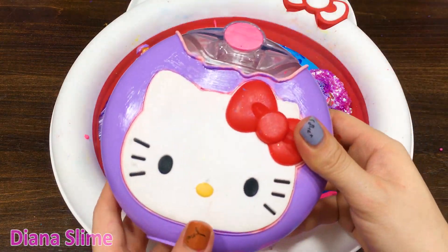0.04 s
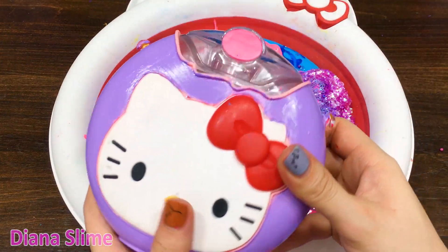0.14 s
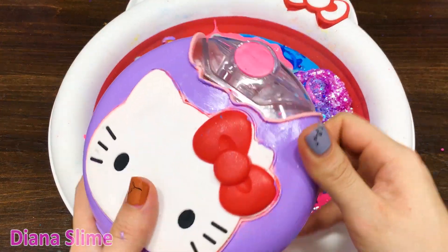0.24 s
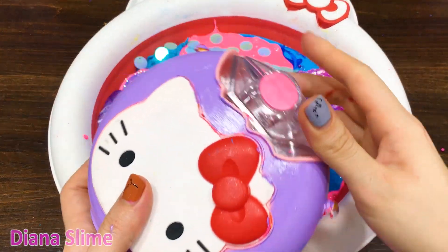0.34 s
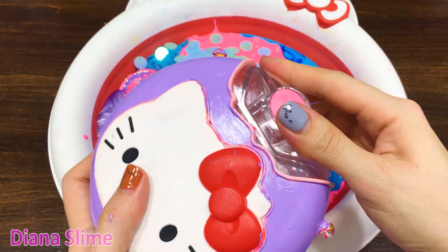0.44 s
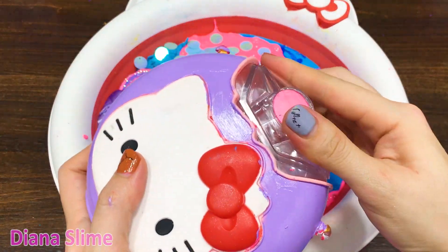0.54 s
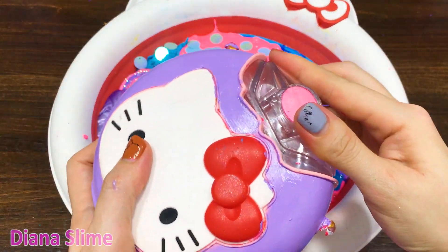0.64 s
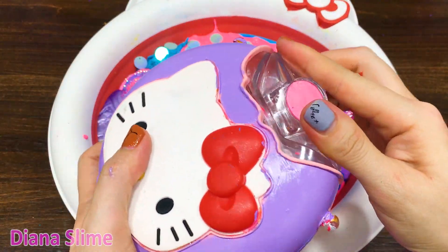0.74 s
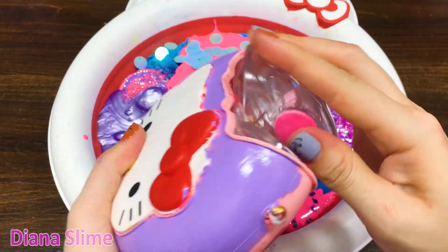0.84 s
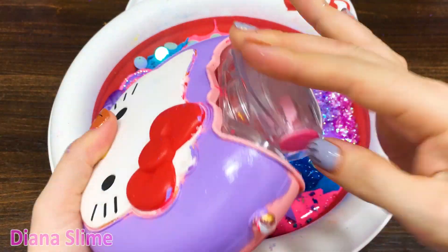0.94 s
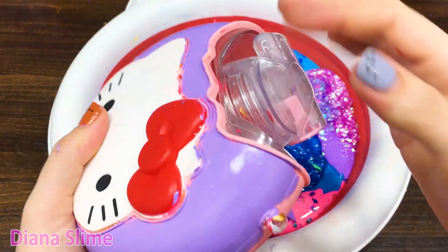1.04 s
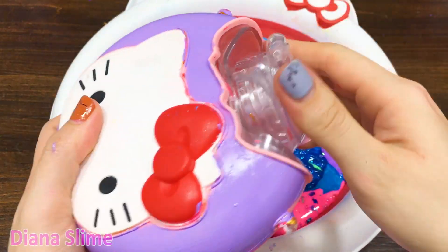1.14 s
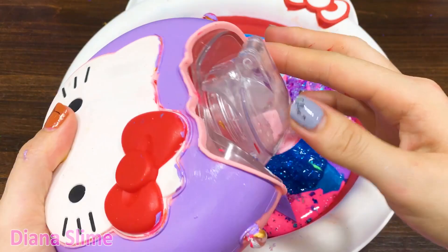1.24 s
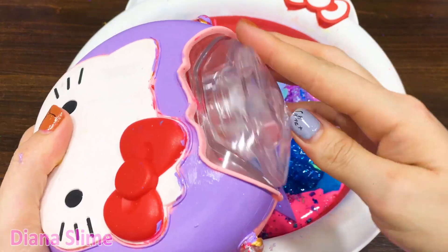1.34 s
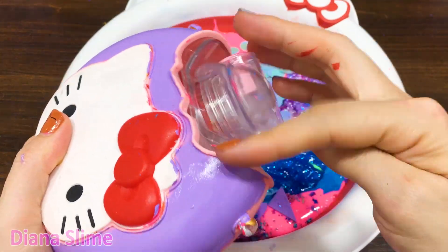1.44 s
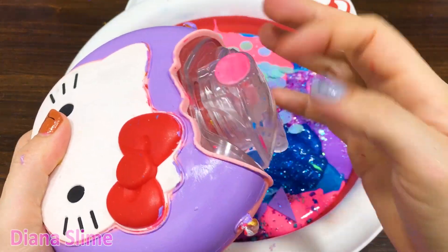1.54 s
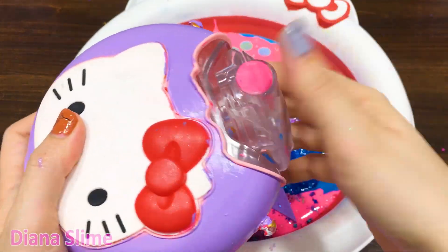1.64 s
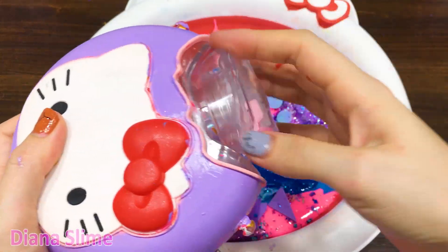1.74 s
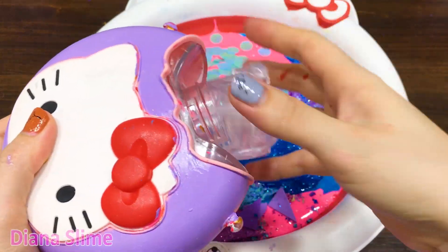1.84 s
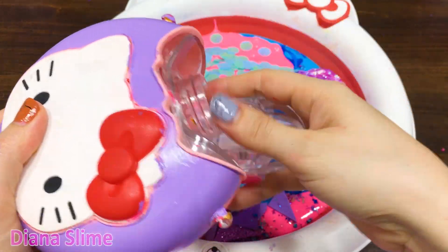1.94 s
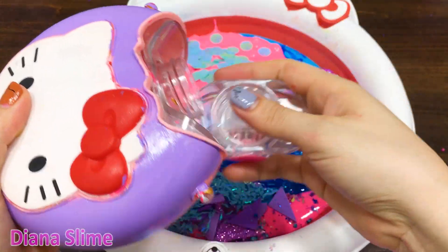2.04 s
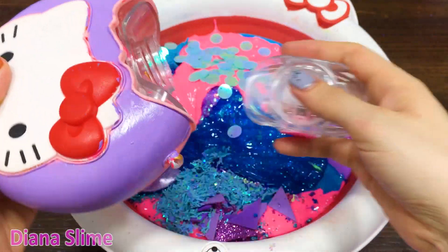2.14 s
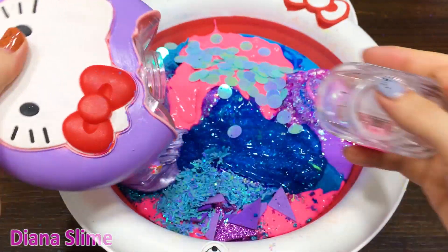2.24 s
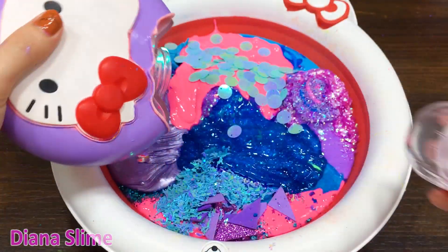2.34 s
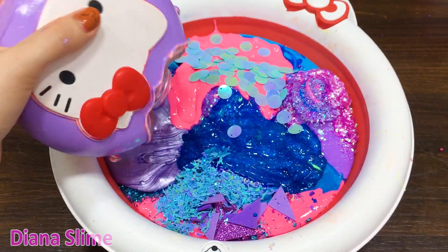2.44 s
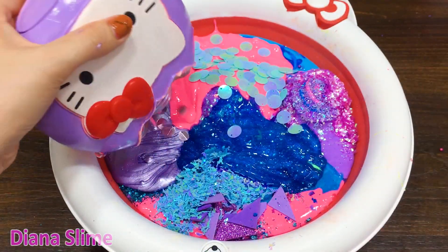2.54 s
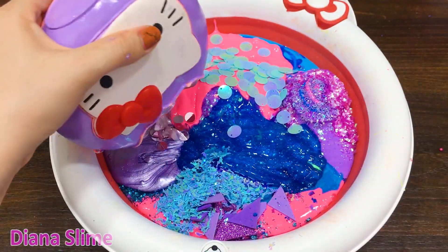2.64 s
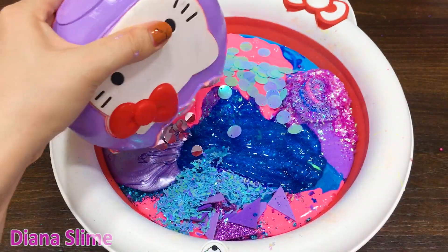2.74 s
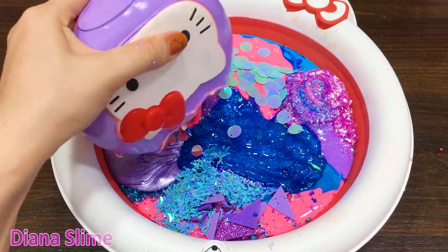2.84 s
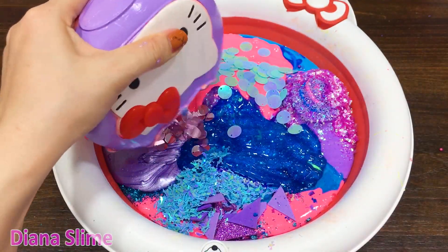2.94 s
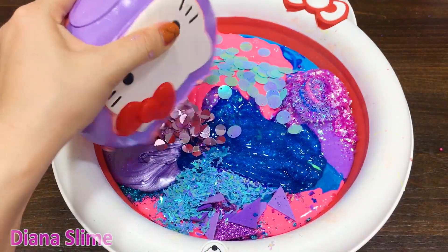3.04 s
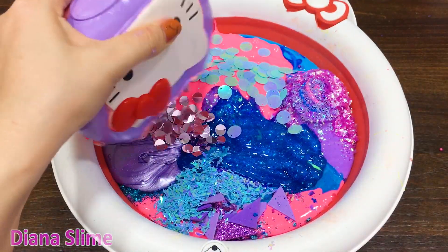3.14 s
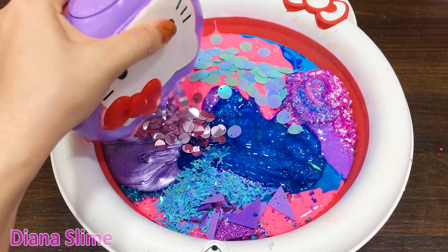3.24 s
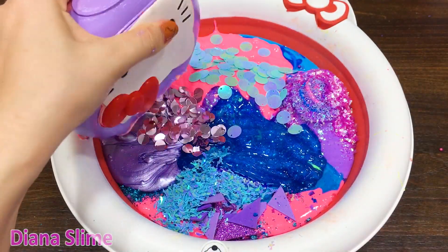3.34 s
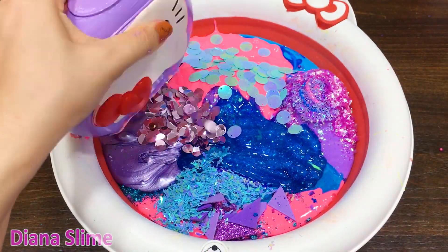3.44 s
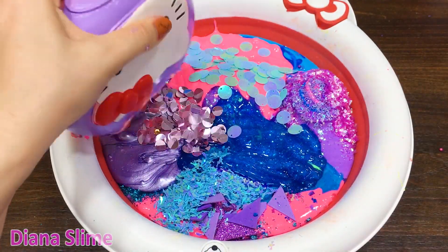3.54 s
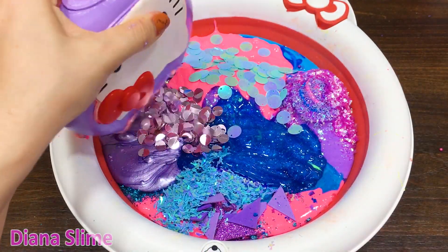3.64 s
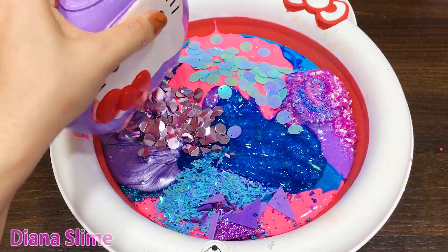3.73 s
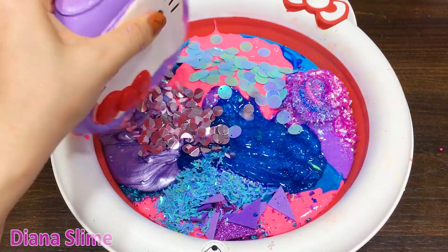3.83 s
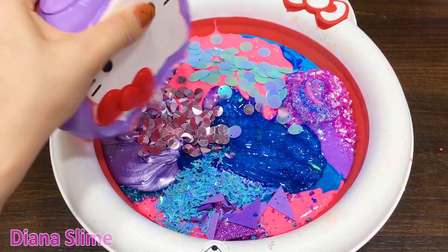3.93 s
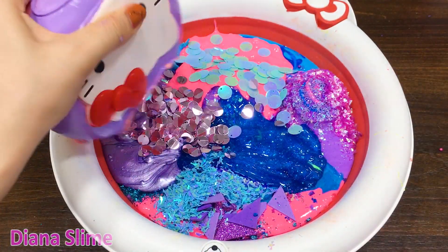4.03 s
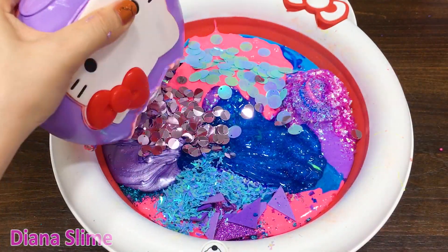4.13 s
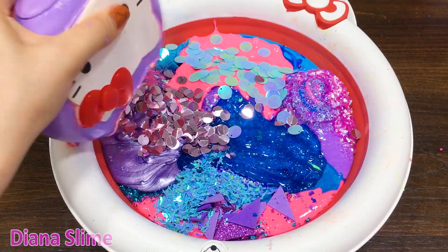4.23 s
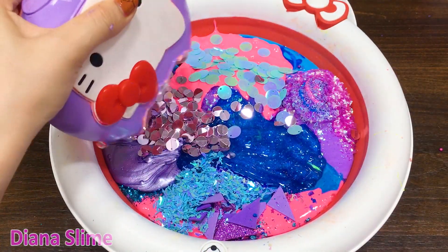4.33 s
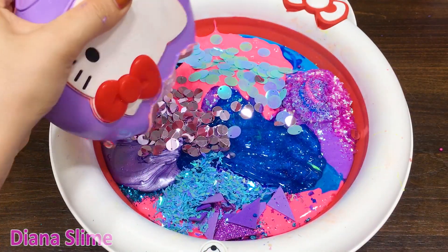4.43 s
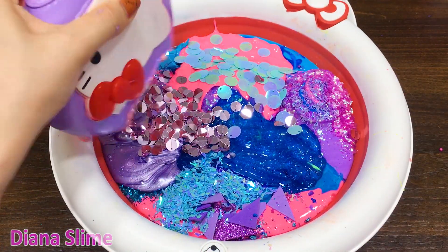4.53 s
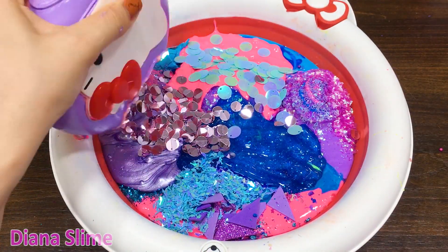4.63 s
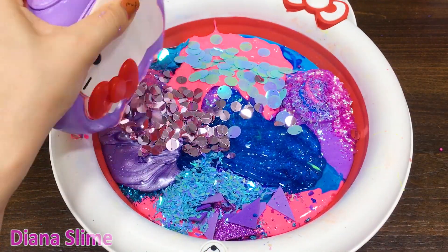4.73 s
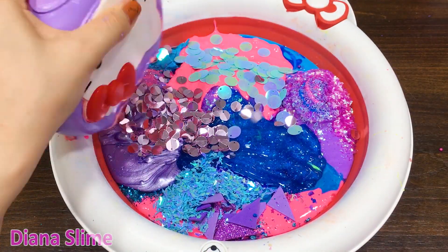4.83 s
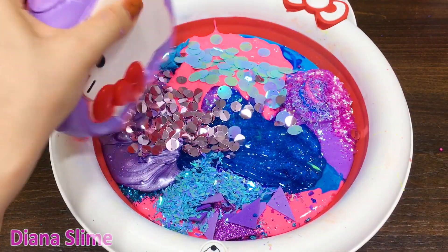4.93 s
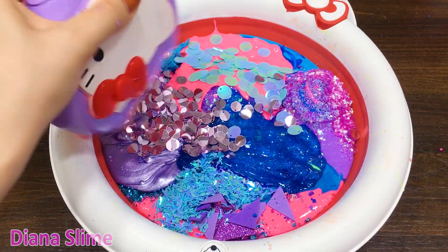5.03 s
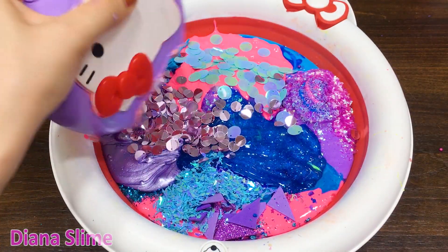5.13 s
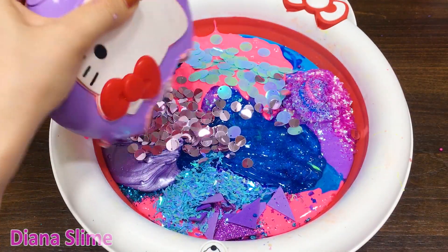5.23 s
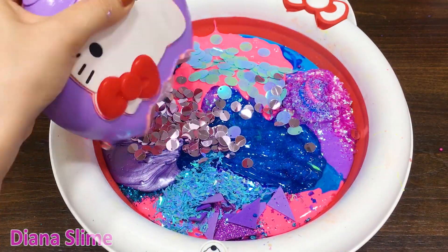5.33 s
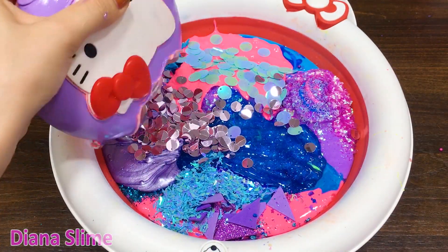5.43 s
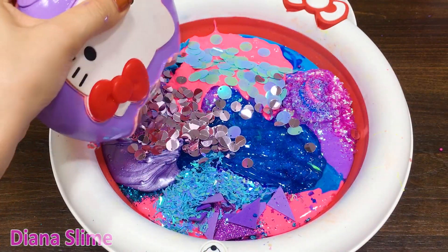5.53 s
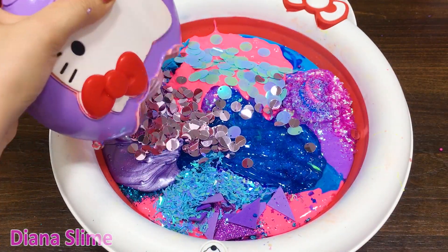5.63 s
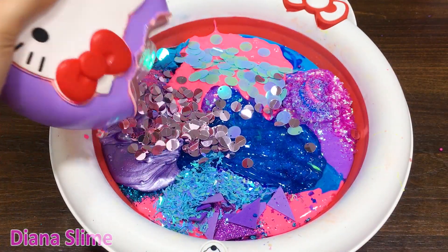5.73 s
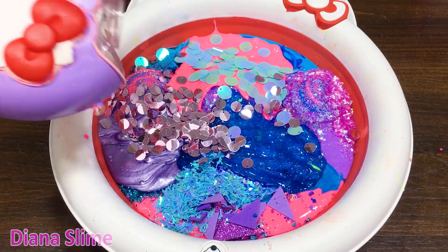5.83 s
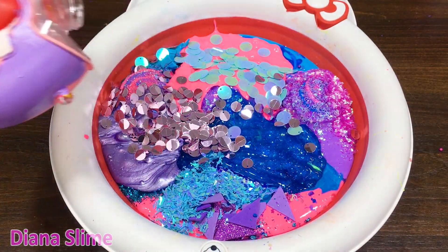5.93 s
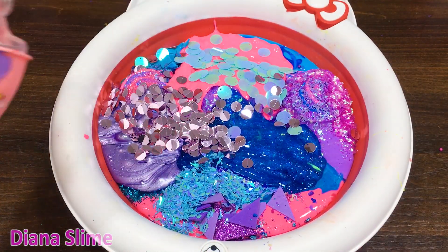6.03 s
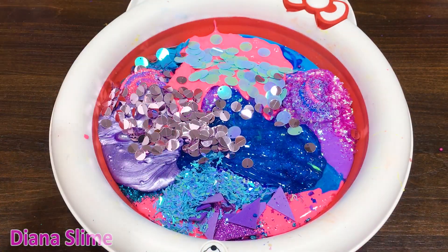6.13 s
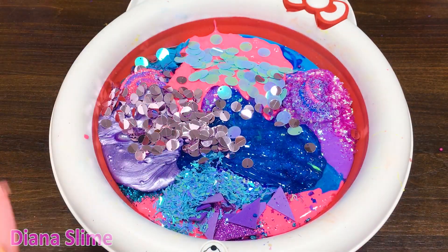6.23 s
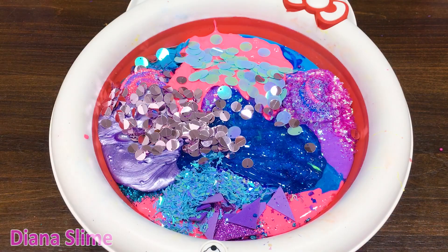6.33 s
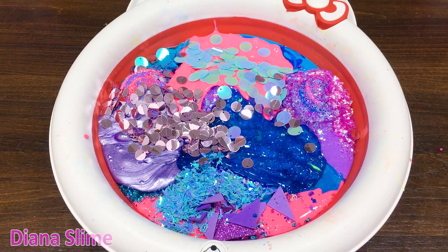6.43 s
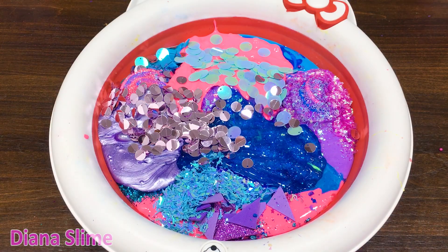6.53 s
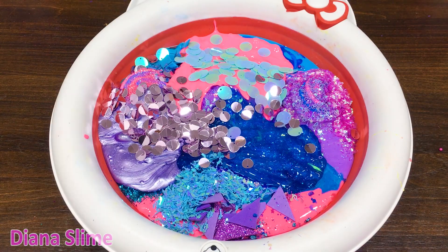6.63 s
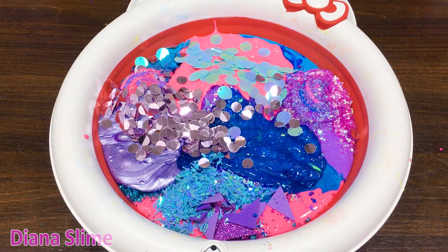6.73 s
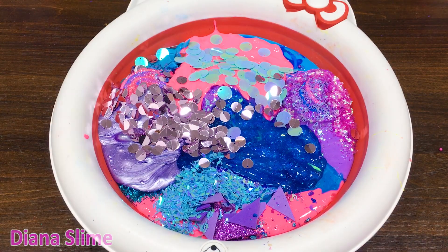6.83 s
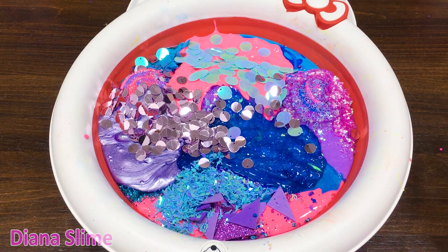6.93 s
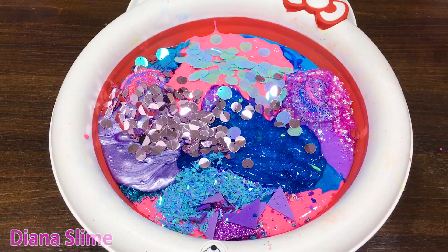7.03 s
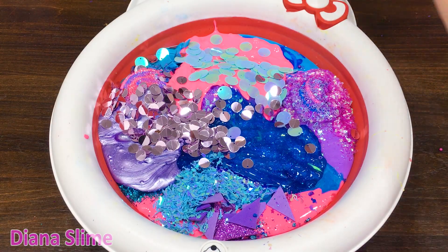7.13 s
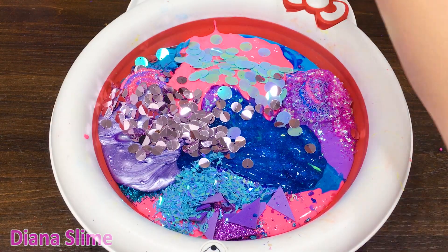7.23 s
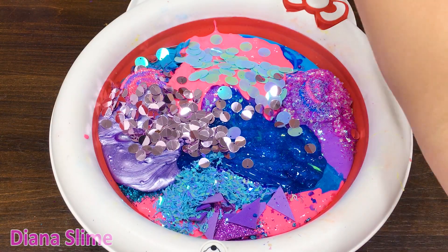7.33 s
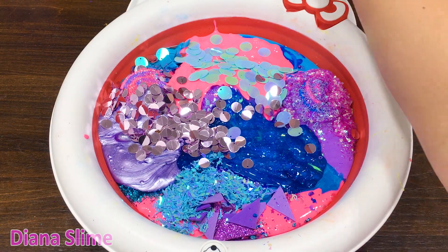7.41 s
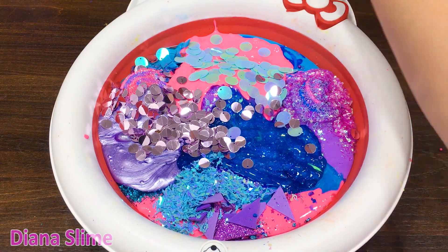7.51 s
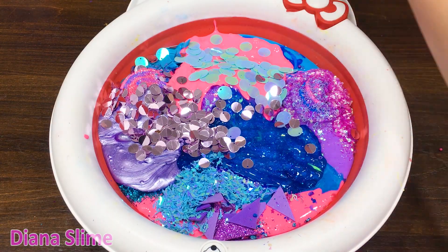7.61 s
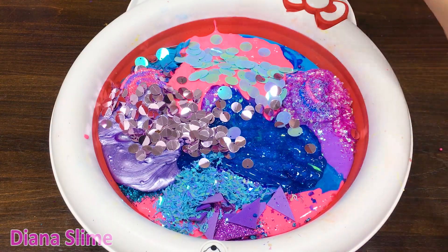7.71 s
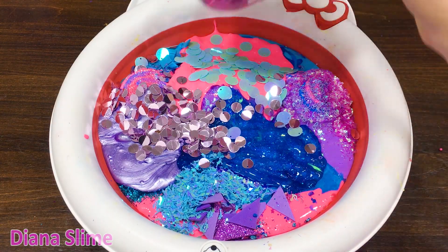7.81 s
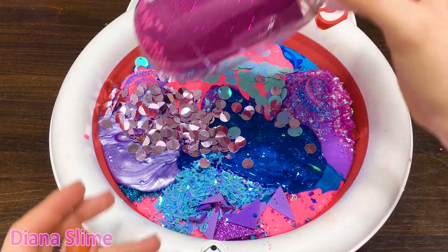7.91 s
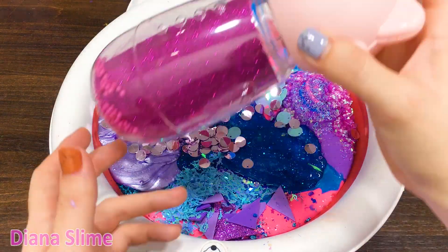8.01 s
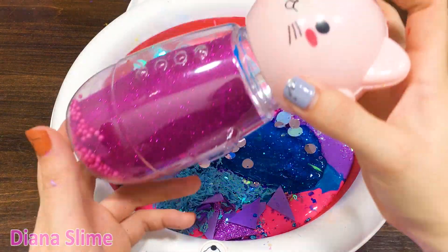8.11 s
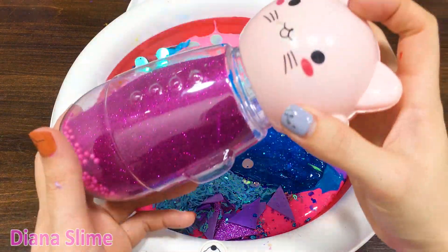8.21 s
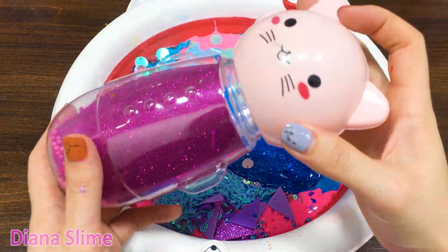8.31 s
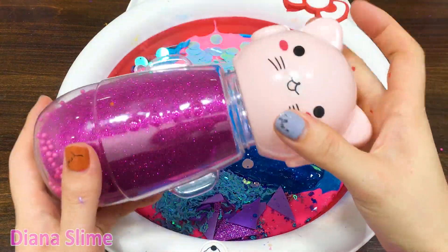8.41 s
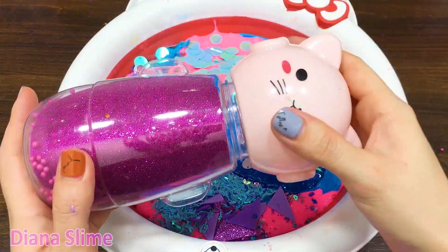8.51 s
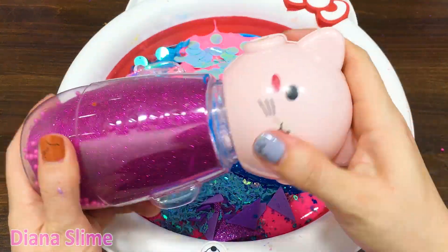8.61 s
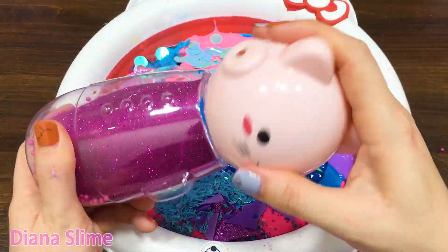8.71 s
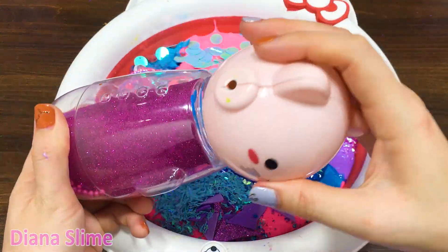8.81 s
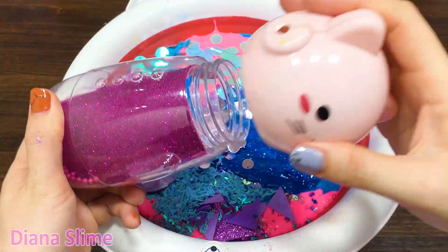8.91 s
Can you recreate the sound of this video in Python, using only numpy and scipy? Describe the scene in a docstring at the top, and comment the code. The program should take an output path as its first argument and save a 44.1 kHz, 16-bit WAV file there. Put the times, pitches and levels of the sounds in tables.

```python
"""Close by in a small room, hands unlatch a hard plastic case and work out its inner cup: shells ring.
Sequins are then shaken from the case in bouts, about nineteen shakes a second, and slide onto slime in
a plastic bowl: thousands of tiny ticks. The case bumps the bowl twice. After a pause, hands pick up a
jar and pull its hollow plastic lid loose with a few knocks. Hands rustle and mutter on the plastic by
stick and slip; filtered noise makes a low rumble and a faint hiss throughout."""
import sys
import numpy as np
from scipy import signal
from scipy.fft import rfft, irfft
from scipy.io import wavfile
from scipy.ndimage import uniform_filter1d

SR = 44100
rng = np.random.default_rng(int(sys.argv[2]) if len(sys.argv) > 2 else 0)


def transcribe(signal):
    """Save signal, clipped to [-1, 1], as a 16-bit WAV file at the path in sys.argv[1]."""
    frames = np.atleast_2d(signal).T
    limited = np.clip(frames, -1, 1)
    pcm = np.round(limited * 32767).astype(np.int16)
    wavfile.write(sys.argv[1], SR, pcm)


N = 395136
TIME = np.arange(N) / SR
EDGE_HZ = 15900  # top of the recorder's range


# Bouts of even shaking: first_shake_s, last_shake_s, first_level_db, last_level_db
SHAKING_BOUTS = [(3.015, 3.125, -27.5, -48), (3.181, 3.278, -31, -22), (3.326, 3.45, -33.5, -35),
                 (3.515, 3.666, -24.5, -23), (3.715, 3.942, -28, -27), (4.005, 4.114, -24.5, -22),
                 (4.165, 4.212, -29.5, -35), (4.63, 4.78, -33.5, -22.5), (4.852, 5.213, -26.5, -23.5),
                 (5.271, 5.325, -27, -23.5), (5.382, 5.431, -24.5, -24.5), (5.495, 5.537, -26.5, -26)]
SHAKES_PER_S, SHAKE_RISE_S, SHAKE_SCATTER_DB = 19, 0.0066, 0.5


def shakes():
    """The wrist swings evenly through each bout, gaining or losing force: one (s, dB, rise s) per throw."""
    throws = []
    for first, last, first_db, last_db in SHAKING_BOUTS:
        count = round((last - first) * SHAKES_PER_S) + 1
        times = np.linspace(first, last, count)
        force_db = np.linspace(first_db, last_db, count)
        force_db = force_db + SHAKE_SCATTER_DB * rng.standard_normal(count)
        throws += [(s, db, SHAKE_RISE_S) for s, db in zip(times, force_db)]
    return throws


# A few sequins snapping sharply on the wall: start_s, peak_level_db
SEQUIN_SNAPS = [(2.54, -25.5), (2.6634, -27.5), (2.6882, -28.5), (2.782, -35), (3.0554, -24.5),
                (3.782, -50), (3.957, -21.5), (4.403, -23), (4.4927, -26.5), (4.955, -30.5), (5.16, -21),
                (5.2824, -31), (5.592, -29), (5.6325, -29.5), (5.7188, -35), (5.8798, -45.5), (6.0635, -40)]
# The heap slides while the case is tipped: start_s, end_s, level_db (before a small trim)
SLIDES = [(2.53, 2.62, -33.5), (2.65, 2.73, -43.5), (2.785, 2.8, -49.5), (2.888, 2.99, -34),
          (3.0, 4.25, -36.5), (4.342, 4.42, -32), (4.52, 4.55, -36.5), (4.66, 4.78, -35.5),
          (4.825, 5.57, -36.5), (5.6, 5.7, -44), (6.025, 6.16, -56)]
# Duller single ticks within the pour: start_s, level_db (before colouring)
DULL_TICKS = [(3.882, -31), (3.892, -22.5), (4.225, -24), (4.252, -28.5), (4.929, -25), (5.202, -26)]
# Colour of the dull ticks: pitch_hz, gain_db
DULL_COLOUR = [(400, -18.5), (1400, 0), (2300, 5), (4000, -9), (7000, -23.5)]
# Colour of the sequins: pitch_hz, relative_level_db
SEQUIN_COLOUR = [(100, -38.5), (350, -19.5), (480, -10), (620, -19), (1500, -14.5), (2300, -5.5),
                 (3600, -9.5), (5600, -4.5), (6500, -7), (8900, -0.5), (10100, -7.5), (11400, -0.5),
                 (13400, -6), (15500, -0.5)]
# How the case rings under the sequins: pitch_hz, relative_level_db, time_to_fall_60_db_s
HEAP_MODES = [(2407, -18, 0.079), (2448, -11, 0.037), (4626, -22, 0.032), (6100, -22, 0.023),
              (9000, -19, 0.017)]
SLIDE_ATTACK_S, SLIDE_FALL_DB_PER_S = 0.013, 246.5
FULL_RING_DB = -30.5  # below this level the heap rings the case a little less readily


def sequins():
    """Each shake throws a clump of ticks at the wall; the heap also slides, and the case rings under it."""
    t = np.arange(SR // 8) / SR
    snaps = [(s, db, 0.0014) for s, db in SEQUIN_SNAPS]
    wall_ticks = patter(per_s=1300, spread_db=2, tick_s=0.0015, bump_db=9)
    thrown = clumps(shakes() + snaps, wall_ticks)
    slide_ticks = patter(per_s=1200, spread_db=3.5, tick_s=0.0009, bump_db=4)
    sliding = strokes(SLIDES, SLIDE_ATTACK_S, SLIDE_FALL_DB_PER_S) * slide_ticks
    heap = thrown + amp(-1.0) * sliding

    heap_level = np.sqrt(abs(uniform_filter1d(heap ** 2, size=2048)))
    weight = np.minimum(heap_level / amp(FULL_RING_DB), 1) ** 0.18
    ring = amp(-5) * signal.oaconvolve(weight * heap, ringing(HEAP_MODES, t))[:N]

    tick = coloured(signal.unit_impulse(len(t)), SEQUIN_COLOUR)
    bright = signal.oaconvolve(heap, tick / np.linalg.norm(tick))[:N]
    dull_rows = [(s, db, 0.0013) for s, db in DULL_TICKS]
    dull = coloured(clumps(dull_rows, rng.standard_normal(N)), DULL_COLOUR)
    return bright + ring + dull


# Snaps of the inner cup: start_s, level_db, brightness_db_per_octave, low_thud_db
# (all knock levels are before the shell's own voice and radiation)
CUP_SNAPS = [(0.5376, -28.5, 0.5, -45.5), (0.6158, -33.5, 0.8, -42.5), (0.6336, -49, -1, -53),
             (0.7551, -42.5, -2.5, -52), (0.7893, -48, -5, -56), (0.9303, -46, 0.5, -52),
             (0.9462, -45.5, 1.3, -47), (0.9877, -37, 2, -43)]
# What the cup rings with: pitch_hz, relative_level_db, time_to_fall_60_db_s
CUP_MODES = [(843, -12, 0.058), (1680, -11.5, 0.028), (3060, 4.5, 0.0073), (3190, -20, 0.03),
             (4600, -9, 0.027), (7000, -39, 0.018)]


def cup():
    """The small inner cup snaps; its stiff shell rings only briefly."""
    return knocks(CUP_SNAPS, CUP_MODES, voice_db=[-1.5, 3, -2.5], ring_db=-1,
                  scatter_db=6.0, scatter_s=0.0014, lag_s=0.00093, lead_db=-18)


# Knocks of the case: start_s, level_db, brightness_db_per_octave, low_thud_db
CASE_KNOCKS = [(1.0393, -43.5, -4, -43.5), (1.066, -39.5, -1.5, -45.5), (1.1236, -45, -3.5, -38.5),
               (1.138, -53.5, -3, -41), (1.2659, -42.5, -3.5, -35), (1.391, -50, -1, -53.5),
               (1.4761, -50, -5.5, -39.5), (1.486, -43, 0.3, -34), (1.5616, -29, -2.5, -30),
               (1.5992, -31, -4.2, -33.5), (1.6219, -33, -4, -39), (1.7925, -41.5, -4, -39),
               (1.803, -38.5, -5, -36.5), (1.8163, -27, -4, -33), (1.8723, -44.5, -4.5, -46),
               (1.9132, -39.5, -2, -37), (1.9302, -40, -3.5, -41), (1.971, -36.5, -1.5, -30.5),
               (1.9833, -29.5, 2, -33), (2.0081, -31, 4.5, -41), (2.0869, -43.5, -1, -48)]
# What the case rings with: pitch_hz, relative_level_db, time_to_fall_60_db_s
CASE_MODES = [(269.4, -6.5, 0.089), (361.3, -4.5, 0.15), (402, -5, 0.053), (764, -10.5, 0.076),
              (1200, -5, 0.055), (1353, 0.5, 0.024), (1870, -10.5, 0.061), (2847, -4, 0.047),
              (3050, -15, 0.071), (4730, -7, 0.031), (6090, -6.5, .025)]


def case():
    """The hard case knocks as it is worked; its larger shell rings lower than the cup."""
    return knocks(CASE_KNOCKS, CASE_MODES, voice_db=[-0.8, 1, -1.5], ring_db=-6.5,
                  scatter_db=9.0, scatter_s=0.0021, lag_s=0.0009, lead_db=-9)


# Bumps on the bowl: start_s, level_db, brightness_db_per_octave, low_thud_db
BOWL_KNOCKS = [(2.943, -32.5, -1.5, -31), (4.3779, -26, -4, -26), (4.385, -41.5, -9.5, -22.5),
               (4.404, -43.5, 0, -36)]
# What the bowl rings with: pitch_hz, relative_level_db, time_to_fall_60_db_s
BOWL_MODES = [(64.7, 6, 0.27), (137.6, -1, 0.33), (195.3, 3.5, 0.2), (292, -20, 0.18), (407, -2.5, 0.092),
              (477, 2.5, 0.058), (820, -0.5, 0.03), (1426, -2, 0.084), (1990, -10.5, .05), (3620, -6, .04)]


def bowl():
    """The case bumps the plastic bowl, which rings with deep modes and much scatter."""
    return knocks(BOWL_KNOCKS, BOWL_MODES, voice_db=[0.3, -1.5, 1], ring_db=-9.5,
                  scatter_db=16, scatter_s=0.0023, lag_s=0.00088, lead_db=-44)


# Knocks of the jar and its lid: start_s, level_db, brightness_db_per_octave, low_thud_db
JAR_KNOCKS = [(8.727, -36, -7.5, -41), (8.747, -48, 4.5, -35.5), (8.8243, -38, -2.5, -28.5),
              (8.8341, -23, -4.5, -25.5), (8.8447, -35, -5, -33), (8.8511, -28, 0.5, -26),
              (8.8615, -39, -11, -26), (8.8763, -61, -7, -43), (8.923, -57, -6.5, -50)]
# What the jar lid rings with: pitch_hz, relative_level_db, time_to_fall_60_db_s
JAR_MODES = [(360, -9, 0.17), (451, -4, 0.057), (510, -7, 0.14), (796, -5, 0.024), (1287, -6, 0.039),
             (1360, -9, 0.016), (1700, -7, 0.01), (2090, -17, 0.021), (3190, 4, 0.011), (4400, -11, 0.071),
             (7230, 1, 0.016)]


def jar():
    """The hollow lid knocks loose, ringing its thin shell."""
    return knocks(JAR_KNOCKS, JAR_MODES, voice_db=[-2.3, 4, -3], ring_db=-4.0,
                  scatter_db=10.0, scatter_s=0.0018, lag_s=0.0015, lead_db=-7.5)


def plastic():
    """The cup, case, bowl and jar lid together; small shells radiate little deep bass."""
    # pitch_hz, gain_db
    radiation = [(30, -28.0), (90, -8.5), (180, -11), (320, 2), (1000, -1.5), (4000, -1.5),
                 (7000, 1), (11000, -2), (16000, -8.0)]
    return coloured(cup() + case() + bowl() + jar(), radiation)


# Edges of the four bands that set a knock's tone, thud to top: pitch_hz
BAND_EDGES_HZ = [100, 550, 2200, 5000, 16000]


def knocks(rows, modes, voice_db, ring_db, scatter_db, scatter_s, lag_s, lead_db,
           lead_s=0.0027, size=8192):
    """A blow spreads through a thin shell as a bending wave, scatters off its edges and rings its modes."""
    out = np.zeros(N)
    t = np.arange(size) / SR
    hz = np.fft.rfftfreq(size, 1 / SR)
    edges = np.array(BAND_EDGES_HZ)
    centres = np.sqrt(edges[:-1] * edges[1:])
    direct = signal.unit_impulse(size)
    # treble travels faster than bass; lag_s is the delay at 1 kHz
    travel = np.exp(-4j * np.pi * lag_s * np.sqrt(1000 * hz))
    blow = irfft(rfft(direct) * travel)
    span = SR // 100  # 10 ms, both for judging the tone and for the lead-in
    for s, db, brightness, thud_db in rows:
        octaves = np.log2(centres[1:] / centres[2])
        band_db = [thud_db, *(db + brightness * octaves + voice_db)]

        scatter_shape = (t / scatter_s) ** 0.11 * np.exp(-t / scatter_s)
        scatter = evened(rng.standard_normal(size) * scatter_shape) / np.sqrt(size)
        # every blow excites the modes a little differently
        struck = [(f, mode_db + 1.6 * rng.standard_normal(), t60) for f, mode_db, t60 in modes]
        shell = direct + amp(scatter_db) * scatter + amp(ring_db) * ringing(struck, t)
        hit = signal.fftconvolve(blow, shell)[:size]

        # bring each band to its wanted level; a second pass comes closer
        for _ in range(2):
            power = 2 * abs(rfft(hit[:span], size)) ** 2 / (size * span)
            own_db = [10 * np.log10(power[(hz >= lo) & (hz < hi)].sum())
                      for lo, hi in zip(edges, edges[1:])]
            hit = coloured(hit, list(zip(centres, np.subtract(band_db, own_db))), size=2048)
        add(out, s - lag_s / 2, hit)

        # a brief rising noise leads into each knock
        lead_in = rng.standard_normal(span) * np.exp(t[:span] / lead_s)
        lead_in /= np.linalg.norm(lead_in)
        add(out, s - span / SR, amp(lead_db) * signal.fftconvolve(hit, lead_in))
    return out


# Light taps and the faintest knocks of the cup and case: start_s, level_db
LIGHT_TAPS = [(0.028, -57), (.142, -69), (0.175, -58), (0.241, -53), (0.4, -51), (0.416, -54), (.597, -40),
              (0.735, -47), (1.2217, -50), (1.283, -51), (1.301, -49), (1.407, -50.5), (1.589, -32.5),
              (8.015, -53.5), (8.456, -58), (8.655, -59)]
# Fingers rubbing on plastic, and two faint slides of sequins: start_s, end_s, level_db (before a small trim)
RUBS_AND_FAINT_SLIDES = [(0, .5, -70.5), (.54, .6, -55), (.65, .71, -62), (.93, .98, -53),
                         (1.33, 1.41, -66), (1.46, 1.56, -47), (2.11, 2.135, -67), (2.425, 2.53, -59.5),
                         (6.03, 6.18, -63.5), (7.88, 8.5, -73), (8.005, 8.14, -63.5), (8.5, 8.8, -65)]
# Hands shifting on the hollow plastic: start_s, end_s, level_db (before a small trim)
GRIPS = [(0, .42, -60.5), (1.5, 1.63, -43), (2.21, 2.25, -56), (2.4, 2.65, -63.5), (5.405, 5.43, -47),
         (6.08, 6.11, -58.5), (7.46, 7.485, -57.5)]
# Colour of the rustle and light taps: pitch_hz, relative_level_db
RUSTLE_COLOUR = [(200, -18.5), (900, -3.5), (2000, 2.5), (3200, 2.5), (4000, 2), (6000, 0.5), (8000, 4),
                 (12000, -3.5), (16000, -9)]
# Colour of the hollow mutter: pitch_hz, relative_level_db
GRIP_COLOUR = [(50, -24.5), (130, -4), (220, 1.5), (340, -3), (520, -4), (900, -15), (1400, -14.5),
               (2500, -29.5), (8000, -52.5)]
HAND_ATTACK_S, HAND_FALL_DB_PER_S = 0.029, 204
# after a knock the shell settles in the hands; the two levels are relative to the knock
SETTLE_S, SETTLE_FALL_DB_PER_S = 0.012, 159.5
SETTLE_RUB_DB, SETTLE_GRIP_DB = -25, -17


def hands():
    """Skin sticks and slips on plastic: a fine rustle over a hollow mutter; faint taps and slides join in."""
    blows = CUP_SNAPS + CASE_KNOCKS + BOWL_KNOCKS + JAR_KNOCKS
    # a brighter knock gives a louder rustle
    jolts = [(s, s + SETTLE_S, db + brightness + SETTLE_RUB_DB) for s, db, brightness, _ in blows]
    shudders = [(s, s + SETTLE_S, thud_db + SETTLE_GRIP_DB) for s, _, _, thud_db in blows]
    jolt = strokes(jolts, SETTLE_S, SETTLE_FALL_DB_PER_S)
    shudder = strokes(shudders, SETTLE_S, SETTLE_FALL_DB_PER_S)
    rub = np.hypot(strokes(RUBS_AND_FAINT_SLIDES, HAND_ATTACK_S, HAND_FALL_DB_PER_S), jolt)
    grip = np.hypot(strokes(GRIPS, HAND_ATTACK_S, HAND_FALL_DB_PER_S), shudder)

    slips = rub * patter(per_s=700, spread_db=2, tick_s=0.00091, bump_db=-5.5)
    tap_rows = [(s, db, 0.0014) for s, db in LIGHT_TAPS]
    taps = clumps(tap_rows, grains(per_s=13000, spread_db=14.5))
    tone = coloured(signal.unit_impulse(SR // 20), RUSTLE_COLOUR)
    rustle = signal.oaconvolve(amp(1.5) * slips + taps, tone / np.linalg.norm(tone))[:N]
    mutter = evened(coloured(grains(per_s=700, spread_db=1), GRIP_COLOUR))
    return rustle + amp(0.5) * grip * mutter


# How long the room rings: pitch_hz, time_to_fall_60_db_s
ROOM = [(150, 0.32), (500, 0.2), (2000, 0.23), (6000, 0.2), (15000, 0.094)]


def room(x, gap_s=0.0021):
    """Walls return a short diffuse tail after a tiny gap, each band dying at its own speed."""
    hz, t, noise = signal.stft(rng.standard_normal(SR // 2), SR, nperseg=256)
    fade = amp(-60 * t / read(ROOM, hz)[:, None])
    tail = signal.istft(noise * fade, SR, nperseg=256)[1]
    tail[:round(gap_s * SR)] = 0
    return signal.oaconvolve(x, tail / np.linalg.norm(tail))[:N]


# Level of the low room rumble over time: time_s, level_db
RUMBLE = [(0, -67), (1.9, -67.5), (2.15, -57), (2.55, -63.5), (5.9, -65), (6.2, -59.5), (7.1, -60),
          (8.2, -70.5), (8.96, -62.5)]
# Colour of the rumble: pitch_hz, relative_level_db
RUMBLE_COLOUR = [(22, -42), (36, -14), (55, 0), (100, 2), (170, -8.5), (300, -18.5), (700, -47.5)]
# Colour of the steady hiss: pitch_hz, relative_level_db
HISS_COLOUR = [(88, -27.5), (150, -7.5), (553, -8), (610, -13.5), (786, -12), (1120, -16.5), (2480, -17.5),
               (6450, -21.5), (8150, -20.5), (14900, -25.5), (15800, -34.5)]
HISS_DB = -67.5


def background():
    """Two filtered noises: a low rumble that rises and falls under a steady faint hiss."""
    rumble_noise, hiss_noise = rng.standard_normal((2, N))
    rumble = level(RUMBLE) * evened(coloured(rumble_noise, RUMBLE_COLOUR))
    hiss = amp(HISS_DB) * evened(coloured(hiss_noise, HISS_COLOUR))
    return rumble + hiss


def patter(per_s, spread_db, tick_s, bump_db, count=24, size=512):
    """Small plastic contacts of very unequal size, each a brief burst of one of 24 colours; rms 1."""
    t = np.arange(size) / SR
    hz = np.fft.rfftfreq(size, 1 / SR)
    # a broad bump somewhere in the spectrum, different for each kind of contact
    bump = np.cos(np.pi * (2 * hz / EDGE_HZ + 2 * np.arange(count)[:, None] / count))
    spectra = rfft(rng.standard_normal((count, size))) * amp(bump_db * bump)
    kinds = irfft(spectra) * np.exp(-t / tick_s)
    kinds /= np.linalg.norm(kinds, axis=1, keepdims=True)
    train = grains(per_s, spread_db)
    out = np.zeros(N + size)
    for at in np.flatnonzero(train):
        out[at:at + size] += train[at] * kinds[at % count]
    return evened(out[:N])


def grains(per_s, spread_db):
    """A random train of tiny clicks of very unequal size, rms 1."""
    size = amp(spread_db * np.minimum(rng.exponential(1, N), 4))
    sign = rng.choice([-1, 1], N)
    return evened(size * sign * (rng.random(N) < per_s / SR))


def clumps(rows, ticks):
    """Each (s, dB, rise s) row is a clump of ticks that swells and dies away."""
    t = np.arange(SR // 8) / SR
    out = np.zeros(N)
    for s, db, rise in rows:
        shape = t / rise * np.exp(1 - t / rise)
        clump = ticks[round(s * SR):][:len(t)] * shape
        # equal energy, however many ticks happen to fall inside
        add(out, s, amp(db) * clump * np.linalg.norm(shape) / (np.linalg.norm(clump) + 1e-9))
    return out


def strokes(rows, attack_s, fall_db_per_s):
    """Gain of (start s, end s, dB) movements: each swells, holds and dies away."""
    power = np.zeros(N)
    for start, end, db in rows:
        t = np.arange(0, end - start + 0.5, 1 / SR)
        swell = np.minimum(t / attack_s, 1)
        fall_db = fall_db_per_s * np.maximum(t - (end - start), 0)
        add(power, start, (swell * amp(db - fall_db)) ** 2)
    return np.sqrt(power)


def ringing(modes, t):
    """A struck shell's dying sines; each mode's dB is its energy against a unit click."""
    total = 0
    for hz, db, t60 in modes:
        sine = amp(-60 * t / t60) * np.cos(2 * np.pi * hz * t)
        total = total + amp(db) * evened(sine)
    return total / np.sqrt(len(t))


def coloured(x, colour, size=4096):
    """Filters with the given (Hz, dB) shape, sounding only after its input (minimum phase)."""
    log_gain = np.log(amp(read(colour, abs(np.fft.fftfreq(size, 1 / SR)))))
    taps = np.fft.ifft(np.exp(np.conj(signal.hilbert(log_gain)))).real[:size // 2]
    return signal.oaconvolve(x, taps)[:len(x)]


def read(points, hz):
    """Reads a (Hz, value) curve on a log-frequency axis."""
    f, value = np.transpose(points)
    return np.interp(np.log(hz + 1), np.log(f + 1), value)


def level(curve):
    """A (s, dB) curve as a gain for every sample."""
    return amp(np.interp(TIME, *np.transpose(curve)))


def amp(db):
    """Decibels to gain."""
    return 10 ** (np.asarray(db) / 20)


def evened(x):
    """Scales to rms 1."""
    return x / np.sqrt(np.mean(x ** 2) + 1e-20)


def add(mix, s, sound):
    """Mixes a sound in at time s, cut off at the end of the mix."""
    part = mix[max(round(s * SR), 0):][:len(sound)]
    part += sound[:len(part)]


def scene():
    """All sources at one close microphone; the room answers the plastic and the pour."""
    pour = sequins()
    hard = plastic()
    echo = room(amp(-12.0) * hard + amp(-11.0) * pour)
    return (pour + hard + hands() + echo + background())[None]


def record(dry):
    """The recorder passes nothing much above its band limit."""
    low_pass = signal.firwin(511, EDGE_HZ, window=("kaiser", 8), fs=SR)
    return signal.oaconvolve(dry, low_pass[None], "same")


dry = scene()
out = record(dry)
transcribe(out)
```